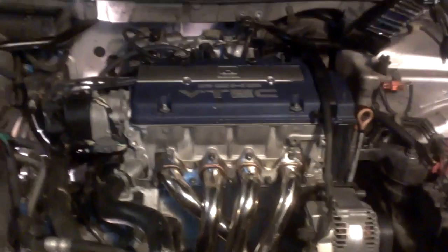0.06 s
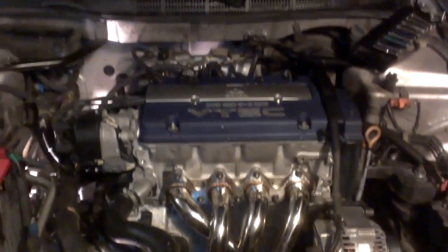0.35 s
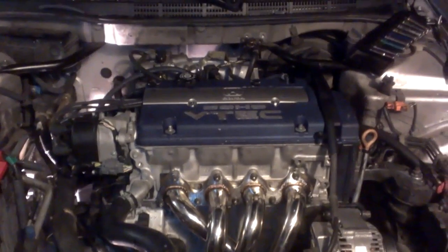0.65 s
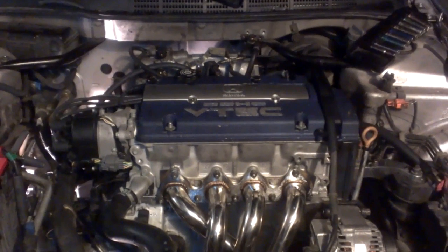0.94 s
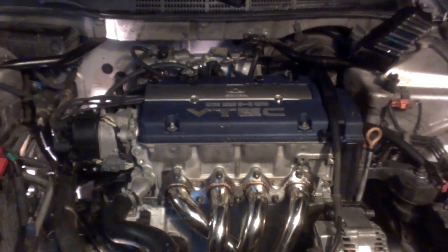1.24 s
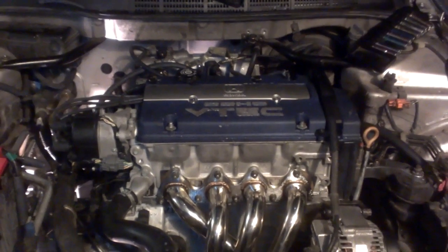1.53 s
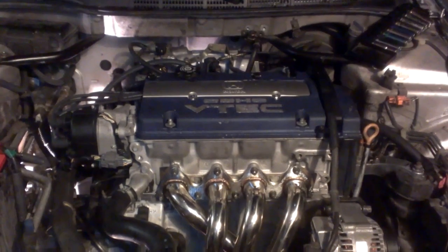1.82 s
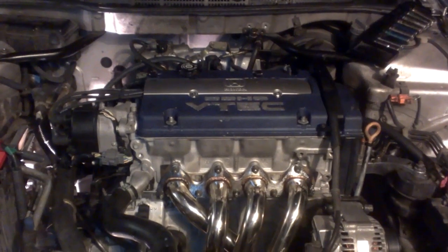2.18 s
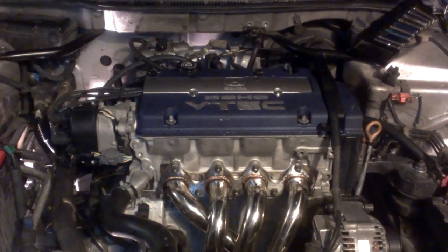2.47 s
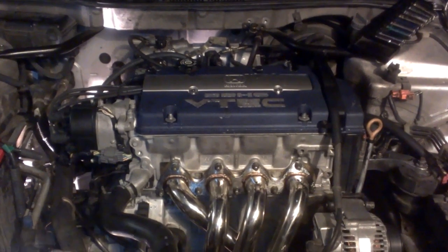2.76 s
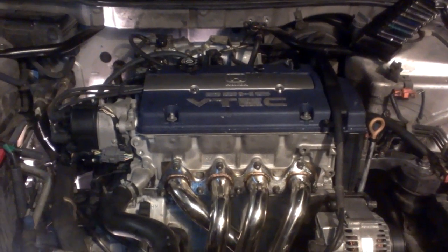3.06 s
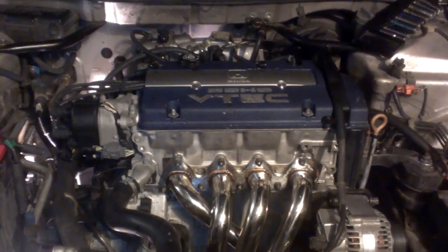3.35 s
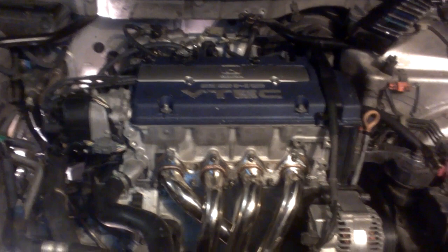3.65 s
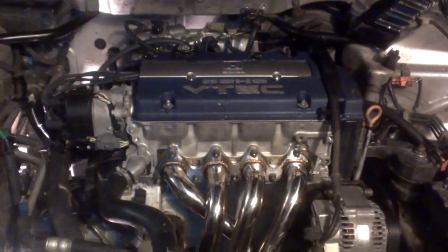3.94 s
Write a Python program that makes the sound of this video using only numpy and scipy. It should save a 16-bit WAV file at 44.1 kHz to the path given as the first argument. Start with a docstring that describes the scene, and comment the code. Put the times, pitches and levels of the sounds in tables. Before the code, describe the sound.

Car engine booms at a fast idle, revs twice, and runs down with crackles.

```python
"""A four-cylinder engine sinks from a rev to a fast, booming idle, is blipped twice with a roar of
intake air, then runs down rasping and crackling; heard from just above its open bay.
Orders of the firing rate sweep through the exhaust resonances. The firings also knock panels, pace the
valve clatter and chop air noise into puffs. A fast limiter holds it all at one loudness."""
import sys
import numpy as np
from scipy import signal
from scipy.fft import rfft, irfft
from scipy.io import wavfile
from scipy.ndimage import uniform_filter1d, minimum_filter1d

SR = 44100
rng = np.random.default_rng(int(sys.argv[2]) if len(sys.argv) > 2 else 0)


def to_wav(s):
    """Save 16-bit WAV."""
    ch = np.atleast_2d(s).T  # columns
    pcm = np.round(np.clip(ch, -1, 1) * 32767)  # PCM
    wavfile.write(sys.argv[1], SR, pcm.astype(np.int16))


N = 176400
T = np.arange(N) / SR


def from_db(db):
    """Decibels to gain."""
    return 10 ** (np.asarray(db) / 20)


def rms_one(x):
    """Scale to unit rms."""
    return x / np.sqrt(np.mean(np.abs(x) ** 2) + 1e-20)


def in_time(rows):
    """Read (time, value) rows at every sample."""
    return np.interp(T, *np.transpose(rows))


def at_hz(points, hz):
    """Read a spectrum on a log-frequency axis."""
    f, value = np.transpose(points)
    return np.interp(np.log(np.maximum(hz, 1)), np.log(f), value)


def drift(hz):
    """Slow random motion, unit rms."""
    hop, settle = 40, 2000
    r = np.exp(-2 * np.pi * hz * hop / SR)
    slow = signal.lfilter([1], [1, -2 * r, r * r], rng.standard_normal(N // hop + settle + 2))[settle:]
    return np.interp(np.arange(N) / hop, np.arange(len(slow)), rms_one(slow))


def resonate(x, hz, width_hz):
    """One resonance, unit rms."""
    r = np.exp(-np.pi * width_hz / SR)
    return rms_one(signal.lfilter([1, 0, -1], [1, -2 * r * np.cos(2 * np.pi * hz / SR), r * r], x))


def causal(spectrum):
    """Frequencies and log response of a causal filter that rolls off beyond its table."""
    hz = np.maximum(np.arange(N // 2 + 1) * SR / N, 1)
    rolloff = np.minimum(hz / spectrum[0][0], 1) * np.minimum(spectrum[-1][0] / hz, 1)
    cepstrum = irfft(np.log(from_db(at_hz(spectrum, hz)) * np.maximum(rolloff, .01) ** 2))
    return hz, rfft(np.r_[cepstrum[0], 2 * cepstrum[1:N // 2]], N)


def air(spectrum, envelope):
    """Stereo turbulence: enveloped noise rings through a filter of unit power gain."""
    # left-right likeness: (frequency [Hz], correlation [0-1])
    likeness = [(60, .98), (250, .92), (500, .87), (1000, .68), (2000, .43), (4000, .22), (12000, .14)]
    # left minus right: (frequency [Hz], level [dB])
    balance = [(100, .3), (500, 1.4), (1000, 1), (2000, -2.2), (4000, -1), (10000, -.2)]
    hz, response = causal(spectrum)
    mid, side = rfft(rng.standard_normal((2, N)) * envelope)
    alike = np.clip(at_hz(likeness, hz), 0, 1)
    sides = np.array([[1], [-1]])
    pair = np.sqrt((1 + alike) / 2) * mid + sides * np.sqrt((1 - alike) / 2) * side
    return irfft(pair * rms_one(np.exp(response)) * from_db(sides * at_hz(balance, hz) / 2), N)


def pulses(cycles):
    """One impulse per completed cycle."""
    return np.diff(np.floor(cycles), prepend=0)


def puffs(firings, decay_cycles, scatter_db, rise_cycles=.11):
    """One puff of random strength per firing, swelling and dying within the cycle."""
    strength = from_db(scatter_db * rng.standard_normal(1024))
    phase = firings % 1
    rise = 1 - (1 - np.exp(-1 / decay_cycles)) * np.exp(-phase / rise_cycles)
    return rms_one(strength[firings.astype(int)] * rise * np.exp(-phase / decay_cycles))


def rumble(rate_hz):
    """The block rumbles, less at high speed, and thuds when the load changes."""
    # block and thud spectra: (frequency [Hz], density [dB])
    block_spectrum = [(20, -14), (45, -5), (75, 0), (130, -2), (250, -4), (450, -14), (1000, -35)]
    thud_spectrum = [(25, -29.5), (50, -29), (75, 13), (110, -5), (200, -24)]
    # load changes: (time [s], width [s], level [dB])
    thuds = [(.336, 0.012, -9.5), (2.021, 0.011, -15.5)]
    slowest_db, fade_db_per_hz = -26.5, .04
    level = from_db(slowest_db - fade_db_per_hz * (rate_hz - rate_hz.min()))
    swell = sum(from_db(db) * np.exp(-.5 * ((T - s) / width_s) ** 2) for s, width_s, db in thuds)
    return air(block_spectrum, level) + air(thud_spectrum, swell)


def valves(firings):
    """Valve clatter, partly ringing in the cylinder head."""
    # clatter: (frequency [Hz], density [dB])
    spectrum = [(400, 3.5), (900, 2.5), (1300, -3.5), (2000, -4.5), (2700, -1), (3600, -8), (5000, -10.5),
                (7500, -28), (10000, -44), (13000, -76)]
    # head resonances: (frequency [Hz], width [Hz], level [dB])
    head_modes = [(1320, 50, -13), (1760, 70, -10), (2630, 110, -15)]
    # clatter: (time [s], level [dB])
    levels = [(.45, -39), (.6, -41.5), (.83, -37.5), (1.35, -42), (1.55, -37), (1.74, -40.5), (1.8, -43)]
    clatter = air(spectrum, puffs(firings, decay_cycles=1.6, scatter_db=1))
    ring = sum(from_db(db) * resonate(clatter, hz, width_hz) for hz, width_hz, db in head_modes)
    return (clatter + ring) * from_db(in_time(levels))


def panel(firings):
    """Thin panels, knocked by each firing, rattle and ring briefly."""
    # panel resonances: (frequency [Hz], width [Hz], level [dB])
    modes = [(465, 39, -6.5), (661.5, 44, -4), (731, 43.5, 0.5), (868, 46, -18)]
    # ringing: (time [s], level [dB])
    levels = [(0, -28), (.3, -24.5), (.5, -34), (.72, -33.5), (.88, -22.5), (1.05, -32), (1.38, -30.5),
              (1.5, -24.5), (1.75, -18), (1.86, -29), (2, -19.5), (2.22, -26.5), (2.35, -14), (2.5, -30),
              (2.69, -8.5), (2.8, -44), (3.4, -32), (3.8, -21.5), (4, -31)]
    knocks = rms_one(pulses(firings) + .5 * pulses(firings / 2))
    rattle = air([(200, .0097), (16000, .0063)], puffs(firings, decay_cycles=.14, scatter_db=4))
    ring = sum(from_db(db) * resonate(resonate(knocks + rattle, hz, width_hz), hz, width_hz=140)
               for hz, width_hz, db in modes)
    return rms_one(ring) * from_db(in_time(levels))


def ticks(decay_s=.001):
    """A few dry, bright ticks as the engine winds down."""
    # ticks: (time [s], level [dB])
    onsets = [(3.139, -12), (3.382, -12), (3.416, -17), (3.51, -11)]
    # one tick: (frequency [Hz], density [dB])
    spectrum = [(2000, -7), (7000, -3), (16000, -2)]
    envelope = sum(from_db(db) * (T >= s) * np.exp(-np.abs(T - s) / decay_s) for s, db in onsets)
    return air(spectrum, envelope)


def crackle(firings, decay_s=.0013, scatter_db=2.5, lead_cycles=.38):
    """Loud single cracks, and bursts in which every firing spits twice."""
    # single cracks: (time [s], level [dB])
    cracks = [(.05, -14), (.122, -12), (.164, -13), (.228, -8), (.328, -2), (2.419, -4), (2.428, -7),
              (2.661, -11), (2.686, -12), (2.746, -4), (2.757, -9), (2.7845, -7), (2.839, -1), (2.852, -3),
              (2.879, -7), (2.9786, -7), (3.0125, -5), (3.039, -7), (3.057, -8), (3.078, -8), (3.112, -2),
              (3.138, -7), (3.166, -12), (3.189, -3), (3.268, -2), (3.288, -4), (3.51, -10)]
    # spitting bursts: (start [s], end [s], level [dB])
    spits = [(1.94, 2, -14), (2.425, 2.47, -13), (2.64, 2.69, -16), (2.75, 2.93, -11), (2.97, 3.1, -11),
             (3.19, 3.262, -4), (3.31, 3.46, -15), (3.6, 3.83, -22)]
    # one crack: (frequency [Hz], density [dB])
    spectrum = [(200, 6.5), (900, 0), (1800, -0.5), (4000, -7), (8000, -12.5), (16000, -18.5)]
    pairs = pulses(firings) + .8 * pulses(firings + lead_cycles)
    bursts = sum(from_db(db) * ((T > start) & (T < end)) for start, end, db in spits)
    hits = pairs * bursts * from_db(scatter_db * rng.standard_normal(N))
    for s, db in cracks:
        hits[int(s * SR)] = from_db(db)
    envelope = signal.lfilter([1], [1, -np.exp(-1 / (decay_s * SR))], hits + 1e-18)
    return air(spectrum, envelope)


def vacuum_hiss(firings):
    """The vacuum behind the throttle hisses, pulsing slightly with the firings."""
    # hiss: (frequency [Hz], density [dB])
    spectrum = [(1500, -4), (4000, 3.5), (8000, 6), (13000, 6), (16000, 6)]
    # hiss: (time [s], level [dB])
    levels = [(0, -35), (.25, -29), (.385, -25), (.44, -45), (.52, -62), (.7, -100), (1.87, -100),
              (1.905, -42), (2.25, -31), (2.31, -35), (2.41, -36), (2.66, -27), (2.705, -35), (2.735, -35),
              (2.76, -25), (2.86, -24), (2.94, -30), (3.3, -33), (3.6, -35), (3.8, -30), (4, -35)]
    return air(spectrum, puffs(firings, decay_cycles=8.2, scatter_db=2) * from_db(in_time(levels)))


def overrun_rasp(firings, sputter_db=1):
    """Firings rasp unevenly, most on a shut throttle, and ring in the header pipes."""
    # rasp: (frequency [Hz], density [dB])
    spectrum = [(30, -9), (70, -3.5), (130, -9.5), (300, 3.5), (500, 4), (900, -0.5), (1300, -3.5),
                (1800, -11.5), (2600, -9.5), (4000, -14), (7000, -24.5), (16000, -57)]
    # rasp: (time [s], level [dB])
    levels = [(0, -20), (.215, -21), (.235, -14), (.3, -22), (.335, -19), (.44, -36), (.55, -70),
              (1.85, -70), (1.95, -24), (2.25, -22), (2.41, -27), (2.66, -15), (2.7, -22), (2.74, -22),
              (2.755, -15), (2.85, -9), (2.9, -16), (2.95, -18), (3.04, -12), (3.14, -20), (3.23, -16),
              (3.3, -18), (3.45, -17), (3.52, -22), (3.82, -18), (3.95, -26)]
    # header resonances: (frequency [Hz], width [Hz], level [dB])
    header_modes = [(911, 16, -19), (1028, 41, -15.5), (1596, 42, -20), (1990, 62, -20), (2495, 240, -23)]
    level = from_db(in_time(levels) + sputter_db * drift(hz=45))
    rasp = air(spectrum, puffs(firings, decay_cycles=.71, scatter_db=1))
    ring = sum(from_db(db) * resonate(rasp, hz, width_hz) for hz, width_hz, db in header_modes)
    return (rasp + ring) * level


def throttle(open_s, close_s, rise_s, decay_s):
    """A blip rises, holds and dies away."""
    return np.clip((T - open_s) / rise_s, 0, 1) * np.exp(-np.maximum(T - close_s, 0) / decay_s)


def intake(firings):
    """Air is gulped once per firing; a brighter jet builds as the throttle opens wide."""
    # throttle blips: (open [s], close [s], roar [dB], jet [dB], jet rise [s])
    blips = [(1.925, 2.215, -13, -15.5, .14), (2.414, 2.605, -12, -12, .095)]
    # roar and jet spectra: (frequency [Hz], density [dB])
    roar_spectrum = [(60, -17), (200, -8.5), (450, 9.5), (700, -2), (1100, 3), (1700, 0), (2500, -0.5),
                     (5000, -5.5), (9000, -51.5), (16000, -90)]
    jet_spectrum = [(1500, -16), (3500, -2), (6000, 0), (10000, -1), (16000, -5)]
    gulps = puffs(firings, decay_cycles=.76, scatter_db=2.5)
    roar = jet = 0
    for open_s, close_s, roar_db, jet_db, jet_rise_s in blips:
        roar += from_db(roar_db) * throttle(open_s, close_s, rise_s=.079, decay_s=.093)
        jet += from_db(jet_db) * throttle(open_s, close_s, jet_rise_s, decay_s=.032)
    return air(roar_spectrum, gulps * roar) + air(jet_spectrum, jet)


def exhaust(rate_hz, firings):
    """Engine orders sweep through the pipe's resonances and flutter when combustion is uneven."""
    # partials, halves from unequal cylinders: (order [x firing rate], level [dB])
    orders = [(1.0, -5), (1.5, -15.5), (2.0, 3), (2.5, -6), (3.0, 7), (3.5, 4.5), (4.0, 8.5), (4.5, 12.5),
              (5.0, 3.5), (5.5, 13.5), (6.0, 3), (7.0, 5.5), (8.0, 3), (9.0, -4), (10.0, -4.5),
              (12.0, -9.5)]
    # pipe resonances for whole orders, narrow boom for halves: (frequency [Hz], gain [dB])
    pipe_spectrum = [(45.0, -16.5), (75.0, -6.0), (110.0, -0.5), (135.0, -12), (165.0, 4.5), (190.0, -11.5),
                     (215.0, -1.5), (255.0, -17.5), (295.0, 0.5), (350.0, -12), (400.0, -17.5),
                     (460.0, -10), (580.0, -18), (730.0, -17), (900.0, -21.5), (1600.0, -15)]
    boom_spectrum = [(80.0, -19.5), (140.0, -6), (165.0, 2.5), (195.0, 4.5), (220.0, -4.5), (260.0, -18),
                     (320.0, -17), (500.0, -30.5)]
    # lift of two orders with load and speed: (time [s], third [dB], fourth [dB])
    emphasis = [(0.0, -4, -4.5), (0.12, -21, -1), (0.25, 1, -1), (0.45, -1, 6.5), (0.601, -13.5, 9.5),
                (0.8, 1, -1.5), (1.1, -0.5, 5.0), (1.4, 4.5, 2.5), (1.9, 7.5, 10), (2.2, 9.5, 5.0),
                (2.4, 1.5, -4), (2.62, 24.5, -20), (2.73, 0.5, -6.0), (2.85, 9.5, 2), (3.0, 1.5, -15),
                (3.25, -1.5, -16), (3.4, 1.5, 10), (3.52, 2, -4.5), (3.65, -18, -3), (3.8, 2.5, -2),
                (4.0, -0.5, 1)]
    # uneven combustion: (time [s], roughness [0-1])
    roughness = [(0, .1), (.33, .45), (.55, .12), (.9, .14), (1.88, .14), (2.05, .35), (2.2, .08),
                 (2.62, .08), (2.78, .7), (3.15, .12), (3.6, .08), (4, .15)]
    # whole note: (time [s], level [dB])
    levels = [(0, -11), (.35, -9), (.5, -11), (1.3, -10), (1.92, -13.5), (2.04, -24.5), (2.25, -16),
              (2.4, -12.5), (2.54, -26.5), (2.64, -12.5), (2.75, -16), (3, -17), (3.4, -12), (4, -11)]
    hz, pipe = causal(pipe_spectrum)
    _, boom = causal(boom_spectrum)
    s, third_db, fourth_db = np.transpose(emphasis)
    lift_db = {3: np.interp(T, s, third_db), 4: np.interp(T, s, fourth_db)}
    rough = in_time(roughness)
    note = power = 0
    for order, db in orders:
        resonance = np.exp(np.interp(order * rate_hz, hz, boom if order % 1 else pipe))
        gain = from_db(db + lift_db.get(order, 0)) * resonance
        flutter = 1 + rough * (drift(hz=14) + 1j * drift(hz=14))
        note += np.real(gain * flutter * np.exp(2j * np.pi * order * firings))
        power += np.abs(gain) ** 2 * (1 + 2 * rough ** 2) / 2
    return note / np.sqrt(power) * from_db(in_time(levels))


def scene():
    """Sum the layers; one slightly wobbling engine speed drives all but the ticks."""
    # engine speed: (time [s], firing rate [Hz])
    speed = [(0, 78), (.12, 71), (.26, 62), (.34, 52), (.42, 45.5), (.5, 45.7), (.62, 48), (.85, 52),
             (1.25, 55.3), (1.85, 58), (1.95, 60.5), (2.02, 72), (2.12, 92), (2.23, 109), (2.33, 113),
             (2.41, 108.4), (2.49, 116), (2.58, 131), (2.67, 138.5), (3, 117), (3.19, 104.5), (3.41, 88.3),
             (3.73, 67.7), (4, 50.6)]
    rate_hz = in_time(speed) * (1 + .0025 * drift(hz=9))
    firings = np.cumsum(rate_hz) / SR
    return (exhaust(rate_hz, firings) + panel(firings) + valves(firings) + intake(firings)
            + overrun_rasp(firings) + vacuum_hiss(firings) + crackle(firings) + ticks()
            + rumble(rate_hz))


def record(dry):
    """Fast limiter, soft clip on the peaks that slip past it, then low and high cut."""
    drive_db, release_db_per_s, ceiling, overload = 3.5, 309, .78, .9
    low_cut_hz, high_cut_hz = 35, 15900
    x = dry * from_db(drive_db)
    level = uniform_filter1d(np.abs(x).max(axis=0), size=21)
    over_db = 20 * np.log10(np.maximum(level / ceiling, 1))
    held_db = np.maximum.accumulate(over_db + release_db_per_s * T) - release_db_per_s * T
    x = x * uniform_filter1d(minimum_filter1d(from_db(-held_db), size=65), size=65)
    x = x / (1 + (x / overload) ** 10) ** (1 / 10)
    x = signal.sosfilt(signal.butter(1, low_cut_hz, "high", fs=SR, output="sos"), x)
    return signal.sosfilt(signal.ellip(12, .1, 70, high_cut_hz, fs=SR, output="sos"), x)


dry = scene()
out = record(dry)
to_wav(out)
```